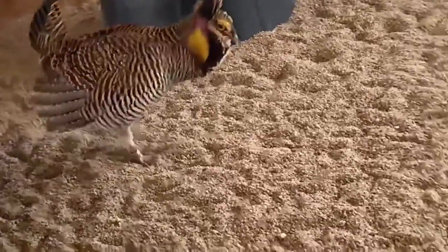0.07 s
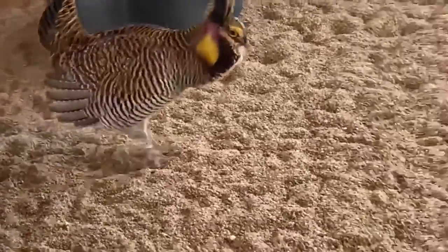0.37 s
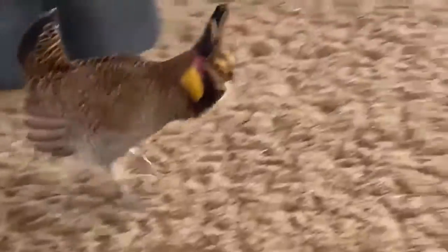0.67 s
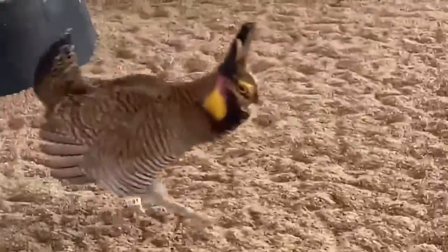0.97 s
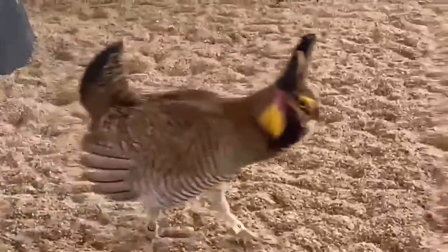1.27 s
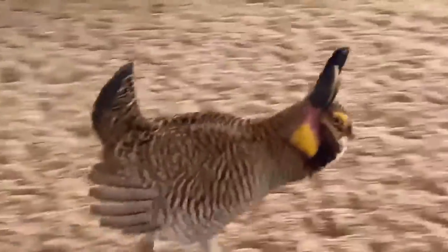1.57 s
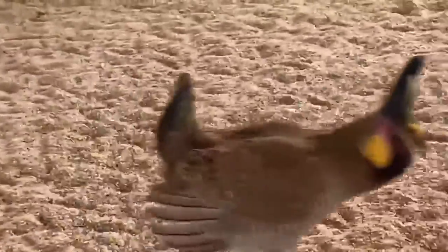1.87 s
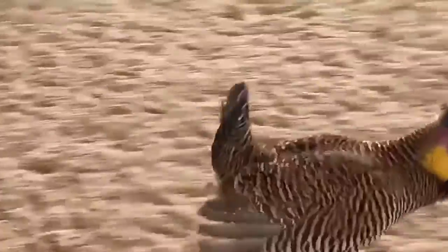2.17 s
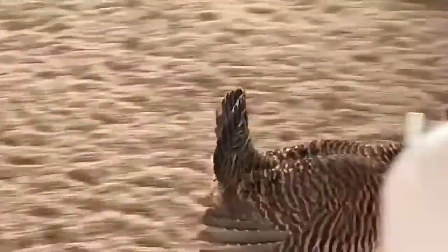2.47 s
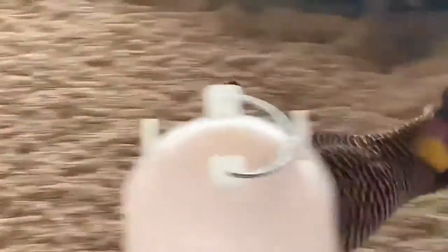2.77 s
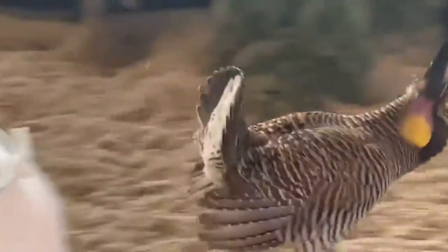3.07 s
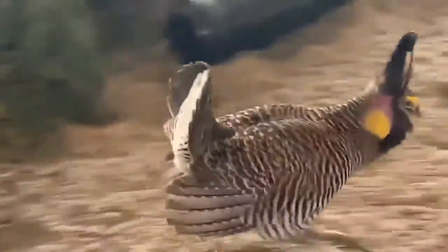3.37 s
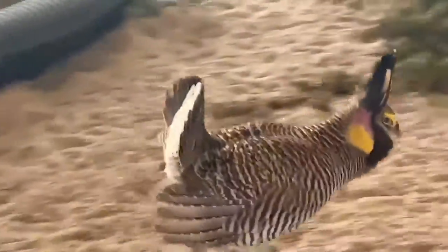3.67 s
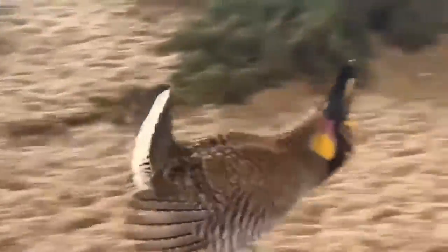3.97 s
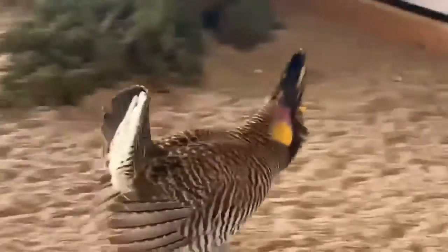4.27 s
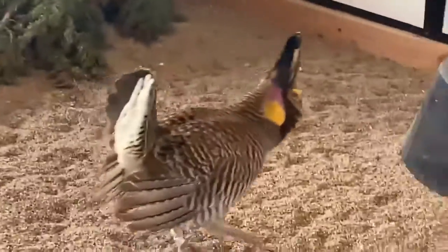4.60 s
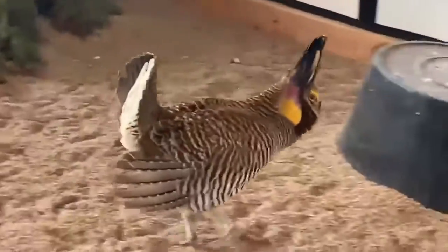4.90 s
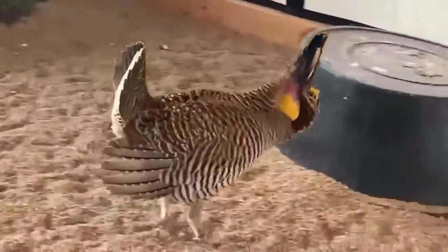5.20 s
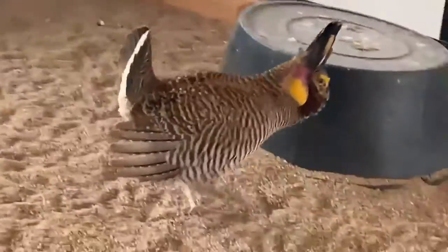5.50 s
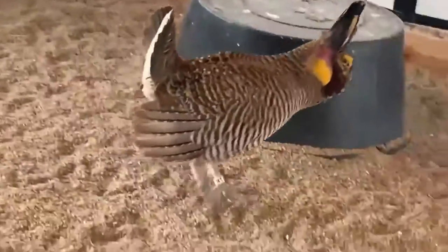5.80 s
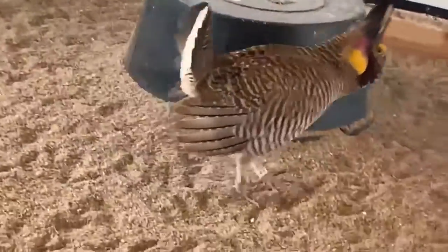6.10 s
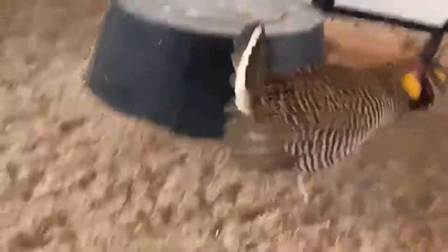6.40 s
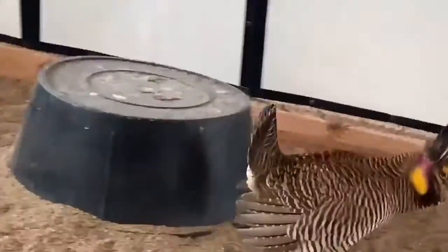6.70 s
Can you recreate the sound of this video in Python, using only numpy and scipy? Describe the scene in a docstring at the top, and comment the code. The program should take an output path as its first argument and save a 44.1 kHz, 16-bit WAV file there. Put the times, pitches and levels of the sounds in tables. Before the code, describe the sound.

Low, almost pure hooting booms from a bird give way to gritty ticks, sandy scuffs and soft steps over an indoor rumble.

```python
"""A prairie chicken booms four times in a sandy indoor pen, its air sacs ringing almost as a sine.
Around the last boom something hollow is bumped and rattles. The bird struts off: sand crunches and
scuffs in showers of tiny grains, grit snaps in ticks that set the microphone port ringing, and soft
footfalls thud. Near the end another bird squawks once, hoarse and falling, farther off.
Under it all lies the low rumble of the hall, with a faint hum that comes and goes."""
import sys
import numpy as np
from scipy import signal
from scipy.fft import rfft, irfft
from scipy.io import wavfile
from scipy.ndimage import uniform_filter1d

SR = 44100
rng = np.random.default_rng(int(sys.argv[2]) if len(sys.argv) > 2 else 0)


def store_wav(level_fs):
    """Save 16-bit WAV to argv[1]."""
    pcm = np.round(np.clip(np.atleast_2d(level_fs), -1, 1) * 32767)
    wavfile.write(sys.argv[1], SR, pcm.T.astype(np.int16))


N = 302085
TIME = np.arange(N) / SR
# treble roll-off of the soft layers and the microphone port's ring: f/Hz, level/dB
ROLL_OFF = [(11700, 0), (12500, -20), (13500, -45)]


def amp(db):
    """Decibels to gain."""
    return 10 ** (np.asarray(db) / 20)


def unit(x):
    """Scales to rms 1."""
    return x / np.sqrt(np.mean(x ** 2) + 1e-20)


def read(points, hz):
    """Reads a table on a log-frequency axis."""
    f, value = np.transpose(points)
    return np.interp(np.log(hz + 1), np.log(f + 1), value)


def follow(rows):
    """Turns breakpoints into automation curves, one per column after the time."""
    s, *columns = np.transpose(rows)
    return [np.interp(TIME, s, c) for c in columns]


def add(mix, s, sound):
    """Mixes a sound in at s seconds."""
    part = mix[..., max(round(s * SR), 0):][..., :sound.shape[-1]]
    part += sound[..., :part.shape[-1]]


def colour(x, spectrum):
    """Shapes x with an EQ curve."""
    n = x.shape[-1]
    return irfft(rfft(x) * amp(read(spectrum, np.fft.rfftfreq(n, 1 / SR))), n)


def resonate(x, hz, width_hz, passes=1):
    """A two-pole band-pass, steeper with each pass."""
    for _ in range(passes):
        x = signal.lfilter(*signal.iirpeak(hz, hz / width_hz, SR), x)
    return x


def drift(rate_hz):
    """A smooth random modulator of rms 1."""
    low_pass = np.exp(-(np.fft.rfftfreq(N, 1 / SR) / rate_hz) ** 2)
    return unit(irfft(rfft(rng.standard_normal(N)) * low_pass, N))


def patchy(x, depth_db, span_hz, span_s):
    """Lets the colour of a noise drift in small patches of time and frequency."""
    spectra = signal.stft(x, SR, nperseg=1024)[2]
    patches = rng.standard_normal(spectra.shape[1:])
    for axis, size in enumerate([span_hz * 1024 / SR, span_s * SR / 512]):
        patches = uniform_filter1d(patches, round(size), axis)
    return signal.istft(spectra * amp(depth_db * unit(patches)), SR, nperseg=1024)[1][:, :N]


def pair(z, alike):
    """Narrows two unrelated channels: alike 0 stays wide, 1 is mono."""
    return np.array([z[0], alike * z[0] + np.sqrt(1 - alike ** 2) * z[1]])


def from_left(x, lag_s):
    """The right channel follows the left a little later."""
    return np.array([x, np.interp(TIME - lag_s, TIME, x)])


def damped_sine(t, hz, t60):
    """A struck resonance that speaks within a cycle and dies away."""
    return np.sin(2 * np.pi * hz * t) * amp(-60 * t / t60) * (1 - np.exp(-2 * hz * t))


def booms(climb_per_s=0.208, scoop_depth=0.131, scoop_s=0.0266, rest_s=0.1, fall_s=0.047):
    """The air sacs ring, rising as they fill; as pressure gives out the tone sags and roughens."""
    # start t/s, end t/s, top f/Hz, end level/dB, octave level/dB, swell/(dB/s), pitch sag/share
    notes = [(-.2, 0.121, 325.8, -51, -16, -10, 0.49), (0.353, 0.4, 289, -50, -15, 2, 0.095),
             (0.444, 0.76, 329.4, -46.5, -16, -8.5, 0.59), (0.979, 1.248, 304.7, -46, -13, 25, 0.424),
             (1.453, 1.494, 293.7, -48, -10, -2, 0.071)]
    out = np.zeros(N)
    waver, tremble, surge, husk = drift(30), drift(33), drift(7), drift(220)
    flutter = unit(resonate(rng.standard_normal(N), hz=72, width_hz=36))
    octave_sway = drift(33)
    rests = [True] + [after[0] - before[1] > rest_s for before, after in zip(notes, notes[1:])]
    for (start, end, top_hz, end_db, octave_db, swell, sag), rested in zip(notes, rests):
        at = np.arange(max(int(start * SR), 0), int((end + fall_s) * SR))
        t = at / SR
        to_go = np.maximum(end - t, 0)
        slack = np.clip((t - end) / fall_s, 0, 1)
        scoop = scoop_depth * np.exp((start - t) / scoop_s) * rested  # slides up after a rest
        hz = top_hz * (1 - climb_per_s * to_go - scoop)
        rough = (0.005 + 0.07 * slack) * husk[at]
        phase = 2 * np.pi * np.cumsum(hz * (1 - sag * slack + 0.006 * waver[at] + rough)) / SR
        octave = amp(octave_db + 7 * slack + octave_sway[at])  # comes forward as the sacs slacken
        tone = np.sin(phase) + octave * np.sin(2 * phase)
        tone *= 1 + 0.035 * husk[at] + 0.055 * flutter[at]
        level = amp(end_db - swell * to_go + 1.64 * tremble[at] + surge[at])
        envelope = np.minimum((t - start) / 0.0023, 1) * (1 - slack ** 2)
        out[at] += np.sqrt(2) * level * envelope * tone
    out += throat_catches()
    return from_left(out, lag_s=0.00008) + amp(-16) * hall(out)


def throat_catches(gap_s=0.00633):
    """Two slack pulses knock the air sacs where a boom breaks in or off."""
    # the second, stronger pulse of each catch: t/s, level/dB
    catches = [(.129, -40.5), (0.441, -40.5), (.771, -38.5), (1.272, -44)]
    out, t = np.zeros(N), np.arange(SR // 10) / SR
    pulse = damped_sine(t, hz=540, t60=0.058)
    for s, db in catches:
        add(out, s - gap_s, amp(db - 4) * pulse)
        add(out, s, amp(db) * pulse)
    return out


def knocks(right_db=-2):
    """Short, dead knocks and clacks; some set a hollow body ringing and buzzing."""
    # hits: t/s, level/dB, f/Hz, t60/s, send to the hollow body/share
    hits = [(.600, -36, 2120, 0.0021, .01), (1.417, -44, 1390, 0.0062, 0), (1.433, -38, 1330, 0.009, 0.35),
            (1.4406, -31, 1410, 0.0067, 0), (1.4503, -30.5, 1020, 0.0025, 0),
            (1.45, -36.5, 2920, 0.0061, 0.05), (1.6908, -29.5, 850, 0.0075, 0),
            (1.6912, -31.5, 390, 0.0088, 0.4), (1.695, -33, 700, 0.0031, 0),
            (1.6985, -37, 1150, 0.005, 0.46), (1.7055, -29.5, 1090, 0.0049, 0.5),
            (1.7334, -36, 1010, 0.031, 0), (1.7378, -37, 770, 0.0067, 0.4),
            (1.742, -37.5, 1400, 0.013, 0.54), (1.8006, -39.5, 1167, 0.022, 0.45),
            (2.081, -45.5, 4550, 0.0092, 0.3), (2.509, -44.5, 1360, 0.0016, 0.16),
            (2.577, -45, 1070, 0.0026, 0.06), (2.579, -46.5, 625, .012, 0),
            (2.966, -40, 4040, 0.0077, 0.06), (3.2542, -35.5, 6330, .006, 0.08),
            (3.2592, -37, 1130, 0.0037, 0.22), (3.312, -45, 2000, 0.01, 0.1),
            (5.087, -52, 530, 0.021, 0.34), (6.02, -41.5, 910, 0.0012, 0.28), (6.054, -46, 450, 0.004, 0),
            (6.103, -49, 520, 0.0035, 0), (6.156, -42, 595, 0.0059, 0.14),
            (6.171, -45.5, 634, 0.0037, 0.37), (6.561, -48.5, 840, 0.0093, 0.84),
            (6.82, -46, 463, 0.015, 0)]
    out, blows, t = np.zeros(N), np.zeros(N), np.arange(SR // 2) / SR
    for s, db, hz, t60, share in hits:
        push = damped_sine(t, hz, t60)
        add(out, s, amp(db + 1) * push / abs(push).max())
        add(blows, s, np.array([amp(db) * share]))
    return out * amp([[0], [right_db]]) + hollow_body(blows) + amp(-11) * hall(out)


def hollow_body(blows, ring_t60=0.3, buzz_t60=0.2, right_db=-3):
    """A hollow body on the left rings at each blow; its crowded upper modes blur into a buzz."""
    # the body's modes: f/Hz
    modes_hz = [691, 848, 957, 1032, 1076, 1228, 1329, 1415, 1465, 1553, 1645, 1740, 1863, 2089]
    # their strengths: level/dB
    modes_db = [-58, -46.5, -43.5, -72, -51.5, -54, -72, -54, -51, -67, -60, -50, -86, -80]
    t = np.arange(SR // 2) / SR
    modes = sum(amp(db) * np.sin(2 * np.pi * (hz * t + 0.038 * rng.random()))
                for hz, db in zip(modes_hz, modes_db))
    upper_modes = resonate(rng.standard_normal(len(t)), hz=3900, width_hz=1300, passes=2)
    ring = amp(-11) * signal.fftconvolve(blows, unit(modes) * amp(-60 * t / ring_t60))[:N]
    buzz = amp(-15) * signal.fftconvolve(blows, unit(upper_modes) * amp(-60 * t / buzz_t60))[:N]
    return from_left(ring, lag_s=0.0001) * amp([[0], [right_db]]) + from_left(buzz, lag_s=0.00017)


def grit_ticks(port_hz=11000, rise_s=0.0001, snap_s=0.0012, press_s=0.0038, crumble_s=0.025):
    """Grit snaps with a crack and a clink, then crumbles; each tick sets the microphone port ringing."""
    # snaps underfoot: t/s, level/dB, crack and clink trim/dB
    snaps = [(0.116, -55.5, -12), (0.967, -73, 19), (1.197, -40, -15), (1.203, -46, -9), (1.667, -35, -22),
             (1.682, -57, -8), (2.069, -31, -18), (2.078, -51, 5), (2.249, -58, -12), (2.4225, -55, 0),
             (2.439, -53, -7), (2.9652, -55.5, 17), (3.02, -49, -12), (3.057, -62, 13.5), (3.174, -37, -14),
             (3.186, -37.5, -31), (3.2417, -58, 10), (3.2538, -38, 9), (3.2577, -45, 7), (3.272, -37, -2),
             (3.311, -40.5, 9), (3.314, -49, 4), (3.334, -50, 1), (3.342, -53, 7), (3.3821, -53.5, 11.5),
             (3.524, -61, 8), (3.562, -45.5, -9), (3.644, -54, 0), (3.7266, -41.5, -7),
             (3.9537, -41.5, -25), (4.2358, -52, -1), (4.2391, -54.5, 10.5), (4.353, -51.5, -2),
             (4.37, -42, -22), (4.404, -39, -35), (4.668, -47.5, -11), (4.931, -54, 3), (6.298, -49, -8)]
    # EQ of the crack: f/Hz, level/dB
    crack_eq = [(600, 27.5), (1500, 18), (3800, 12), (5000, 28.5), (6500, 26), (8300, 26.5), (11000, 28.5),
                (14000, 7)]
    out, t = np.zeros((2, N)), np.arange(6000) / SR - 0.02
    snap = np.exp(np.minimum(t / rise_s, -t / snap_s))
    crumble = np.exp(np.minimum(t / press_s, -t / crumble_s))
    for s, db, crack_db in snaps:
        noise = rng.standard_normal((2, len(t)))
        crumbs = unit(rng.random(len(t)) < 900 / SR)  # about 900 a second
        burst = pair(noise * (snap + amp(-19) * crumble * crumbs), alike=1)
        hz = port_hz * rng.uniform(0.975, 1.005)
        port_ring = unit(colour(resonate(burst, hz, width_hz=910, passes=2), ROLL_OFF))
        crack = colour(pair(noise * snap, alike=0.03), crack_eq) * amp([[-2], [0]])
        tick = amp(11) * port_ring + amp(crack_db + 10) * (unit(crack) + amp(-4) * unit(clink(t)))
        add(out, s + t[0] + 0.0009, amp(db) * tick * np.sqrt(2 / len(t)))  # scaled by energy
    return out + amp(-21) * hall(out)


def clink(t, t60=0.018, count=12):
    """A stone rings very briefly in modes of its own."""
    hz = np.exp(rng.uniform(np.log(1500), np.log(9000), (count, 1)))
    phase = rng.random((2, count, 1))
    age = np.maximum(t, 0)
    return (t > 0) * amp(-60 * age / t60) * np.sin(2 * np.pi * (hz * age + phase)).sum(1)


def footfalls(rise_s=0.045, t60=0.055):
    """Feet land on soft ground: a low damped push with a puff of noise."""
    # steps: t/s, level/dB, f/Hz
    steps = [(0.285, -43, 160), (0.352, -44, 114), (4.555, -41.5, 108), (4.875, -42, 96),
             (5.086, -41.5, 103), (5.514, -45, 213), (5.704, -39, 155), (5.873, -43, 118.7),
             (6.054, -37, 160), (6.327, -48, 105), (6.596, -41.5, 130), (6.641, -42, 104), (6.734, -47, 85),
             (6.822, -36.5, 160)]
    out, t = np.zeros(N), np.arange(SR // 4) / SR
    envelope = amp(-60 * t / t60) * (1 - np.exp(-t / rise_s))
    envelope /= envelope.max()
    for s, db, hz in steps:
        puff = resonate(rng.standard_normal(len(t)), hz=207, width_hz=200)
        puff = unit(resonate(puff, hz=247, width_hz=200))
        add(out, s, amp(db - 1) * envelope * (np.sin(2 * np.pi * hz * t) + amp(-12) * puff))
    return out + amp(-15) * hall(out)


def grains(per_s, spread_db, size=N):
    """Sand grains strike at random, reaching both ears at once: many small impacts, a few large."""
    strength = amp(spread_db * np.minimum(rng.exponential(1, size), 4))
    strikes = rng.random(size) < per_s / SR
    return unit(strength * strikes * rng.standard_normal((2, size)))


def scuffs():
    """Sliding grains swell and die away in a band: a crackle when few, a swish when many."""
    # strokes through sand: peak t/s, level/dB, rise/s, t60/s, centre f/Hz, breadth/octaves,
    # hall send/dB, left minus right/dB, grain rate/(1/s)
    strokes = [(.33, -57, 0.22, 1, 189, 1.33, 3, -0.5, 3300),
               (0.391, -68.5, 0.043, 0.76, 870, 0.43, 5, 8.5, 4000),
               (1.437, -46.5, 0.027, 0.039, 1380, 1.46, -26, 0, 2600),
               (1.43, -59, 0.053, 0.12, 3900, 0.43, 2, -2, 8500),
               (1.698, -44.5, 0.0096, 0.64, 394, 1.06, -9, 4.5, 570),
               (1.708, -44, 0.0093, 0.32, 1260, 0.4, -20, -2, 3200),
               (1.712, -52, 0.011, 0.11, 2060, 0.1, -2.5, -4, 1700),
               (1.733, -48, 0.018, 0.042, 5860, 0.94, -0.5, 0.5, 1300),
               (3.255, -46.5, 0.0034, 0.17, 6600, 1.3, -2, 1, 6800),
               (3.512, -56.5, 0.043, 0.25, 414, 0.71, -7, -1, 2900),
               (3.935, -61.5, 0.059, 0.11, 3030, 0.55, -5.5, 2.5, 8400),
               (4.719, -69, 0.044, 0.3, 4400, 1.9, 4.5, -0.5, 13500),
               (5.668, -53.5, 0.021, 0.25, 4670, 2.7, -6, -0.5, 5300),
               (6.17, -63, 0.031, 1, 530, 0.84, 4.5, 1.5, 89), (6.59, -62, 0.09, 0.2, 420, 0.6, -2, 0, 300)]
    # EQ of a sliding grain: f/Hz, level/dB
    sand_eq = [(2000, 14.5), (2800, 11), (4000, 7.5), (6800, 11.5), (8300, -1), (10800, 18.5), (12500, -41)]
    direct, send, t = np.zeros((2, N)), np.zeros((2, N)), np.arange(SR) / SR - 0.5
    f = np.fft.rfftfreq(SR, 1 / SR) + 1
    for s, db, rise, t60, hz, octaves, hall_db, side_db, per_s in strokes:
        alike = 0.71 if hz < 2000 else -0.076  # dull scuffs are narrow, bright ones wide
        sand = colour(pair(grains(per_s, spread_db=0.83, size=SR), alike), sand_eq)
        band = np.exp(-0.5 * (np.log2(f / hz) / octaves) ** 2)
        rub = unit(irfft(rfft(sand) * band, SR))
        envelope = np.exp(np.minimum(t, 0) / rise) * amp(-60 * np.maximum(t, 0) / t60)
        gains = amp(db + side_db * np.array([[0.5], [-0.5]]))
        scuff = (gains * envelope * rub)[:, t >= -s]
        add(direct, s + t[0], scuff)
        add(send, s + t[0], amp(hall_db) * scuff)
    return direct + hall(send)


def sand_crunch(press_s=0.015, settle_s=0.045, clump_hz=35):
    """Sand shifts all the while and crunches under each foot in clumps: broad rustle, fine high fizz."""
    # steadily shifting sand: t/s, level/dB
    shifting = [(0.0, -83), (1.05, -76), (1.41, -71.5), (2.31, -73.5), (2.5, -83.5), (2.9, -73.5),
                (3.13, -73.5), (4.12, -71.5), (4.46, -81), (5.04, -80), (5.51, -79.5), (6.85, -78)]
    # feet sinking in: t/s, fizz level/dB, rustle level/dB
    crunches = [(.45, -97, -84), (1.44, -80, -66.5), (1.84, -67.5, -74.5), (2.145, -66, -73),
                (2.251, -58.5, -77), (2.311, -62.5, -74), (2.43, -63.5, -76), (2.992, -58, -74.5),
                (3.061, -64, -72.5), (3.169, -58, -82), (3.34, -59, -72), (3.549, -65, -87),
                (3.651, -57.5, -71), (3.962, -63.5, -91), (4.135, -65, -84), (5.355, -67, -76),
                (5.448, -84, -77), (5.71, -62.5, -86), (6.1, -66, -89), (6.42, -69, -101), (6.83, -74, -86)]
    # EQ of the rustle: f/Hz, level/dB
    rustle_eq = [(700, -7.5), (1300, 0), (2500, -3), (4000, -1), (5400, -4.5), (6700, -3.5), (8200, -16.5),
                 (10800, -5), (12500, -31)]
    steady_db, = follow(shifting)
    rustle_power, fizz_power = amp(steady_db + 4) ** 2, amp(steady_db - 4) ** 2
    for s, fizz_db, rustle_db in crunches:
        envelope = np.exp(np.maximum(np.minimum((TIME - s) / press_s, (s - TIME) / settle_s), -20))
        rustle_power += (amp(rustle_db + 11.5) * envelope) ** 2
        fizz_power += (amp(fizz_db) * envelope) ** 2
    clumps = drift(clump_hz)
    rustle = colour(grains(per_s=5000, spread_db=3.3), rustle_eq)
    rustle = unit(patchy(rustle, depth_db=3.2, span_hz=260, span_s=0.06))
    fizz = pair(grains(per_s=3000, spread_db=2.5), alike=0.57)
    fizz = unit(resonate(fizz, hz=10700, width_hz=2000, passes=2))
    rustle *= np.sqrt(rustle_power) * amp(2 * clumps)
    fizz *= np.sqrt(fizz_power) * amp(2.5 * clumps)
    return rustle + fizz


def squawk(jitter=0.058, half_lines_db=-6, first_pulse_s=5.633, pulses_per_s=81.5, pulse_s=0.003):
    """Another bird: slack pulses catch into a hoarse voice that falls an octave and rings in the hall."""
    # contour of the call: t/s, f/Hz, level/dB
    contour = [(5.626, 2600, -70), (5.648, 2450, -58), (5.659, 2270, -48.5), (5.671, 1490, -50.5),
               (5.686, 1200, -48.5), (5.71, 1170, -60)]
    # resonances of the throat: f/Hz, level/dB
    throat_eq = [(1200, 5), (2400, 1), (3300, -7.5), (4200, -9), (5300, -17), (6800, -7), (9000, -48)]
    at = (TIME > contour[0][0]) & (TIME < contour[-1][0])
    hz, db = (curve[at] for curve in follow(contour))
    phase = 2 * np.pi * np.cumsum(hz * (1 + jitter * drift(900)[at])) / SR
    voice = sum(amp(read(throat_eq, k * hz / 2) + half_lines_db * (k % 2)) * np.sin(k * phase / 2)
                for k in range(2, 13))  # odd k lie halfway between the harmonics
    since_pulse = (TIME[at] - first_pulse_s) % (1 / pulses_per_s)
    pulses = 0.3 + np.exp(-since_pulse / pulse_s)
    out = np.zeros(N)
    out[at] = amp(db) * unit(voice * pulses)
    return amp(-3.5) * out + amp(-2) * hall(out)


def hall(x, onset_s=0.00057):
    """The hall's reflections: a diffuse tail for each ear, longest in the bass."""
    # reverb decay: f/Hz, t60/s
    decay = [(150, 0.68), (500, 0.26), (1500, 0.44), (5000, 0.38), (12000, 0.14)]
    hz, t, spectra = signal.stft(rng.standard_normal((2, SR)), SR, nperseg=256)
    spectra *= amp(-60 * t / read(decay, hz)[:, None]) * (1 - np.exp(-t / onset_s))
    tail = signal.istft(spectra, SR, nperseg=256)[1]
    return signal.fftconvolve(np.atleast_2d(x), tail / np.linalg.norm(tail[0]), axes=1)[:, :N]


def hum(waver=0.0234, rise_s=0.2, fall_s=0.094):
    """A faint, low, wavering tone swells and fades in the hall."""
    # swells: peak t/s, f/Hz, level/dB
    swells = [(0.792, 177.7, -56), (1.5, 177.7, -56), (4.4, 239.2, -62)]
    out = np.zeros(N)
    wavering_time = np.cumsum(1 + waver * drift(54)) / SR
    for s, hz, db in swells:
        envelope = np.exp(-((TIME - s) / np.where(TIME < s, rise_s, fall_s)) ** 2)
        out += np.sqrt(2) * amp(db) * envelope * np.sin(2 * np.pi * hz * wavering_time)
    return out


def room_tone(lump_db=1.65, swell_db=1.5):
    """The hall's bed: a lumpy rumble, nearly mono, under a wide wash."""
    # fader moves: t/s, rumble level/dB, wash level/dB
    faders = [(0, -58.5, -71), (.35, -49.5, -71), (.9, -57, -68), (1.35, -54.5, -63.5), (2.4, -53.5, -64.5),
              (2.8, -56.5, -66.5), (3.6, -55.5, -64), (4.6, -54.5, -69.5), (5.07, -54, -62.5),
              (5.25, -54.5, -65), (6.45, -55.5, -66), (6.8, -49.5, -67)]
    # EQ of the rumble: f/Hz, level/dB
    rumble_eq = [(20, -63), (33, -16), (52, 1.5), (80, 2), (108, 1), (135, -4), (200, -10), (330, -23.5),
                 (600, -53)]
    # EQ of the wash: f/Hz, level/dB
    wash_eq = [(100, -1.5), (200, -2), (350, 4), (550, -3.5), (1000, -9), (1600, -18), (2600, -25),
               (6000, -74)]
    rumble_db, wash_db = follow(faders)
    rumble = unit(colour(pair(rng.standard_normal((2, N)), alike=0.94), rumble_eq))
    wash = colour(pair(rng.standard_normal((2, N)), alike=0.22), wash_eq)
    wash = unit(patchy(wash, depth_db=3, span_hz=130, span_s=0.07))
    rumble *= amp(rumble_db + 1 + lump_db * drift(19))
    wash *= amp(wash_db + 7 + swell_db * drift(11.5))
    return rumble + wash


def scene():
    """The birds, the ground and the hall; the soft layers lose their top treble."""
    soft = colour(scuffs() + squawk() + sand_crunch() + room_tone(), ROLL_OFF)
    return booms() + hum() + knocks() + grit_ticks() + footfalls() + soft


def record(dry):
    """A steep low-pass at 13.5 kHz on the whole mix."""
    low_pass = signal.firwin(201, 13500, window=("kaiser", 7), fs=SR)
    return signal.oaconvolve(dry, low_pass[None], "same")


dry = scene()
out = record(dry)
store_wav(out)
```